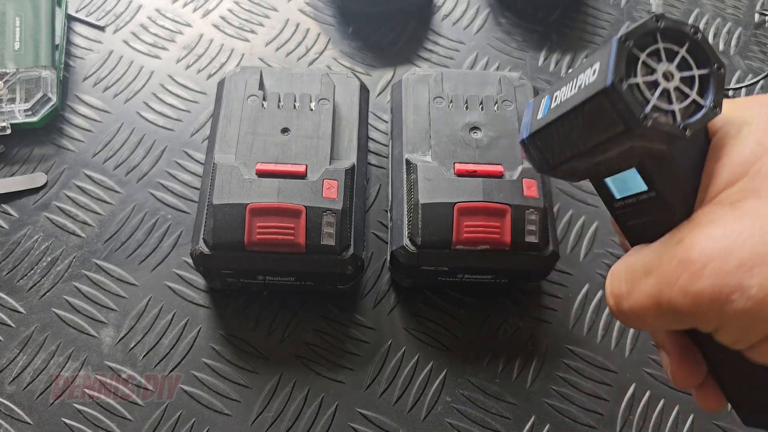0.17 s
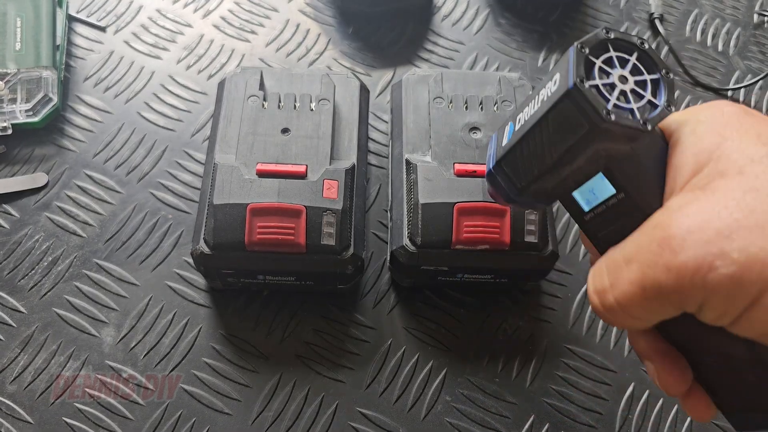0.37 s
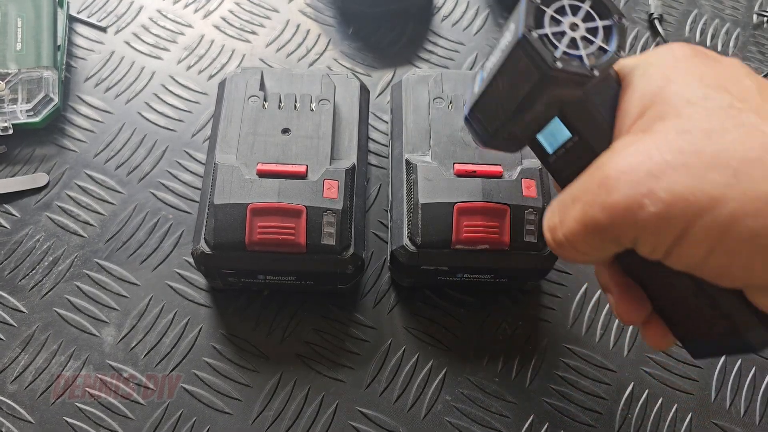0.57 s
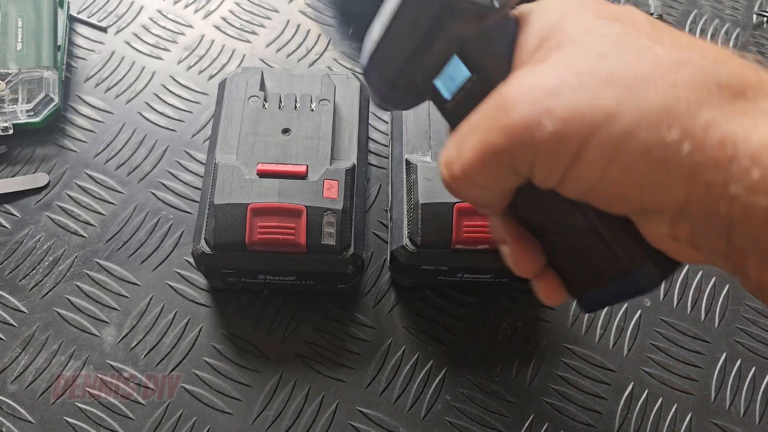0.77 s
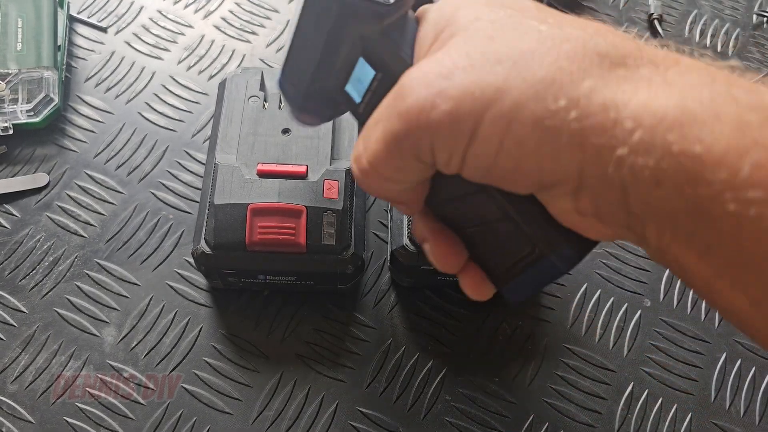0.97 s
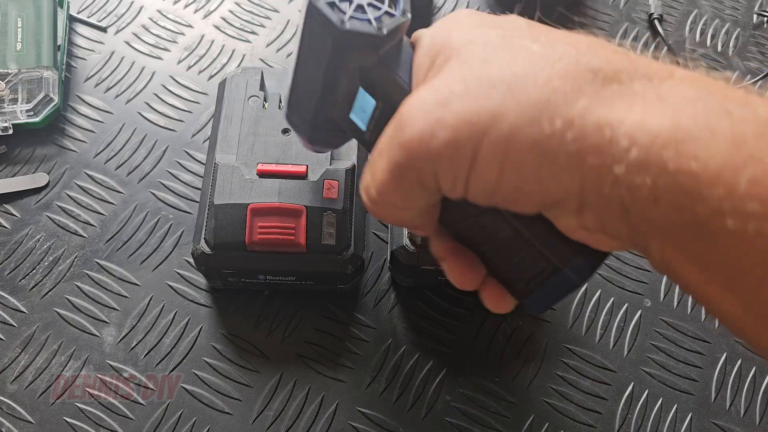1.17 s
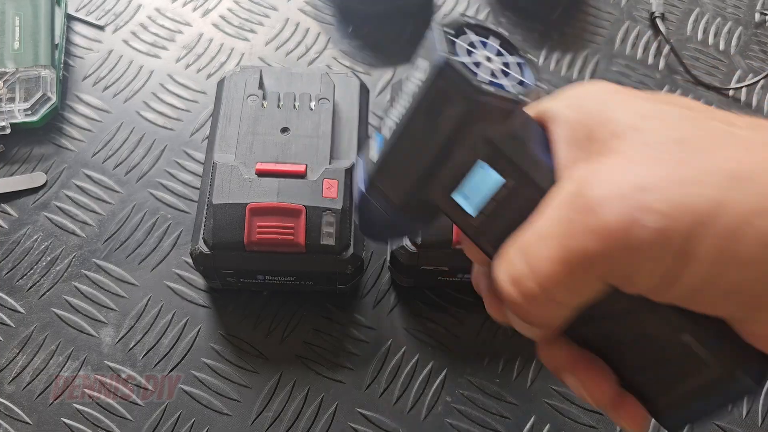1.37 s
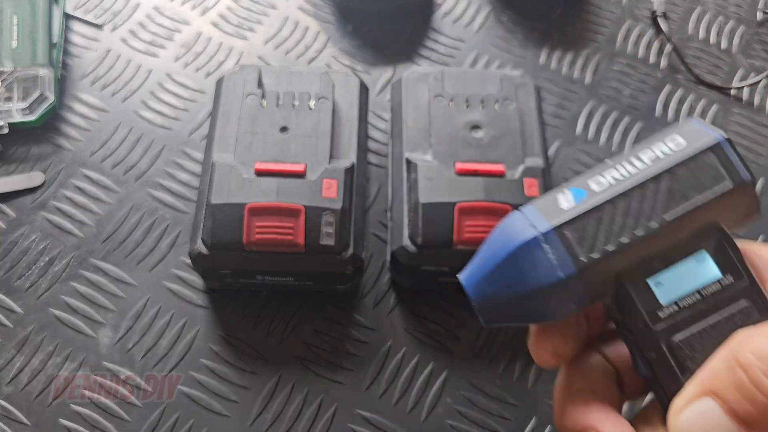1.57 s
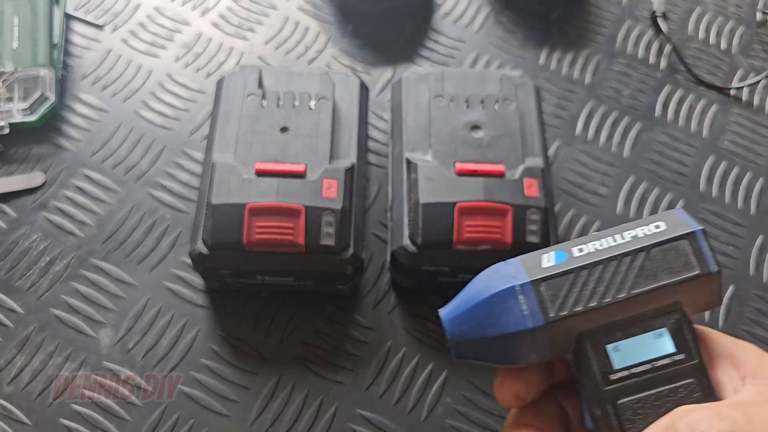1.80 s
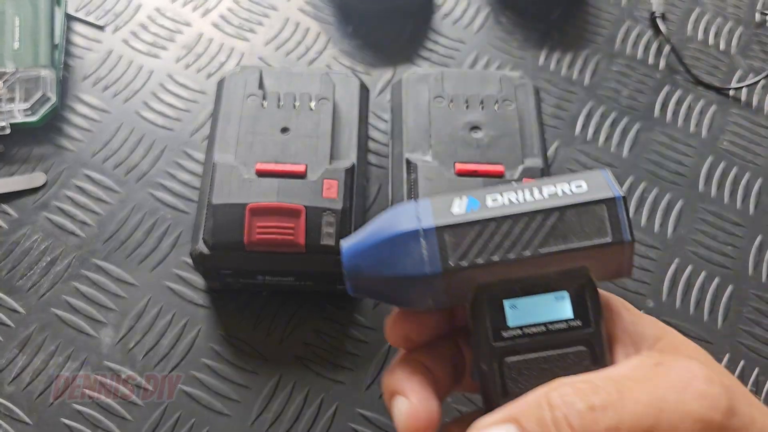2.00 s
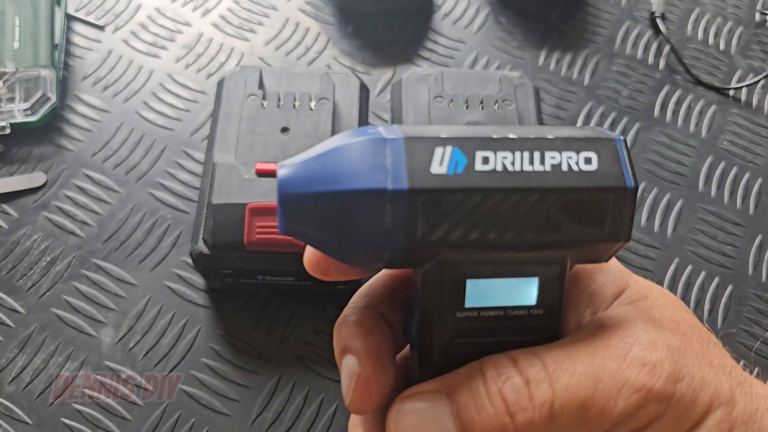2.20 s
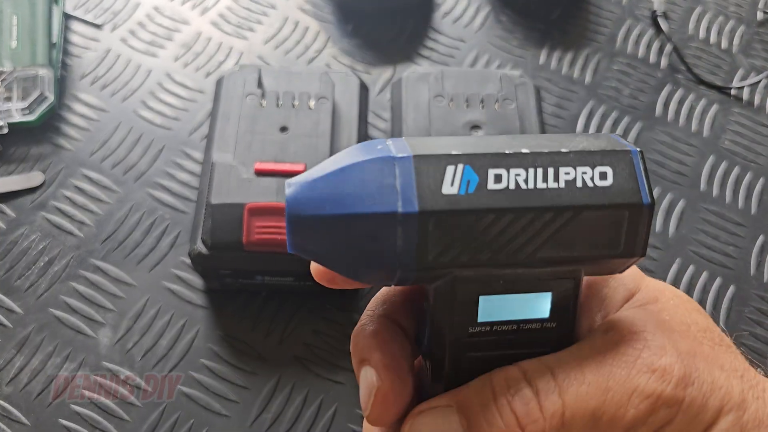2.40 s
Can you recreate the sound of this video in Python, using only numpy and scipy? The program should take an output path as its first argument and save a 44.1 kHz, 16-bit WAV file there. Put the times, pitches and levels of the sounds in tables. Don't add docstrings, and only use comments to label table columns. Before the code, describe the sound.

A handheld electric blower runs at full speed from the start, a loud, bright rush of air with a steady whine near 1.9 kHz, its tone shifting as it moves, with low buffeting on the close microphone. Switched off around 1.46 seconds, the roar drops quickly; hiss and ringing tones glide downward, ending in a soft judder near 2.24 seconds, leaving faint workshop noise with little echo.

```python
import sys
import numpy as np
from scipy import signal
from scipy.fft import rfft, irfft, next_fast_len
from scipy.io import wavfile
from scipy.ndimage import uniform_filter1d, map_coordinates

SR = 44100
rng = np.random.default_rng(int(sys.argv[2]) if len(sys.argv) > 2 else 0)


def gain_from_db(level_db):
    decades = np.asarray(level_db, float) / 20
    return 10 ** decades


def unload_audio(sound):
    columns = np.transpose(np.atleast_2d(sound))
    steps = np.round(np.clip(columns, -1, 1) * 32767)
    wavfile.write(sys.argv[1], SR, steps.astype(np.int16))


N = 107868
TIME_S = np.arange(N) / SR

# time_s, shaft_hz
POWERED_SHAFT = [
    (0, 1927),
    (.3, 1958),
    (.75, 1943),
    (1.2, 1947),
    (1.47, 1934),
]
# time_s, nearness_db, turn (no unit), tilt (no unit), whine_db
HAND = [(0, 0, 0.13, 0.069, -20.5), (.2, -0.5, -0.19, 0.093, -26), (.4, -0.5, -0.14, 0.24, -25.5),
        (.52, -1, 0.11, 0.063, -24), (.58, -1.5, -0.04, 0.035, -17), (.63, -1.5, 0.91, 0.42, -22.5),
        (.72, -1.5, 0.16, 0.16, -15), (.9, -1, 0.25, 0.13, -17), (.98, -1.5, 0.75, 0.13, -24),
        (1.15, -1.5, 1.06, 0.24, -22), (1.22, 0, 0.75, -0.095, -23.5), (1.3, -3, 1.1, 0.92, -17.5),
        (1.4, -2, -0.15, 0.0067, -12), (1.47, -3.5, -0.25, -1.56, -15), (1.51, 2, 0.65, -1.45, -32),
        (1.66, 4, 0.65, 0.021, -55.5), (2.05, 5.5, -0.032, -0.52, -78), (2.44, 4, -0.3, 0, -79)]
# pitch_hz, width_hz, level_db, change_db_per_turn, change_db_per_tilt
CASING = [(196, 330, -18.5, -2.5, -3), (658, 550, -8.5, -4, 3.5), (1404, 350, 0, -1, 3),
          (1667, 388, 1, -1, 4.5), (2747, 356, -4, -2.5, 13), (3125, 410, -5.5, 3.5, 3.5),
          (4360, 570, -6, 4.5, -1), (5580, 555, -5.5, 1.5, 0), (6850, 860, -7.5, -3, -2.5),
          (8640, 1100, -14.5, -2, -4), (9910, 530, -8.5, -2.5, -3), (11180, 2140, -21, -1, -0.5),
          (13160, 1600, -21.5, -0.5, -4.5), (14800, 2400, -32.5, 0, -3)]
# pitch_hz, width_hz, level_db
DUCT = [(740, 320, -18.5), (1480, 286, -8), (2916, 640, 0.5), (3225, 540, 1), (4520, 870, -6.5),
        (5910, 400, 0.5), (7070, 450, -5), (7500, 220, -0.5), (8920, 990, -9), (9400, 320, -6),
        (10380, 420, -9), (12000, 560, -11.5), (12770, 950, -15), (15800, 850, -18)]
# multiple (no unit), level_db, panel_hz, width_hz
PANELS = [(2, -22, 2530, 90), (2, -22, 2800, 260), (2, -23, 3330, 350), (2, -33, 3880, 150),
          (1, -29, 1420, 230), (1, -43, 780, 220), (3, -15, 4200, 230), (4, -22, 6200, 150),
          (4, -24, 6950, 300), (5, -25, 7600, 200), (5, -26, 8900, 450), (5, -32, 2640, 200),
          (6, -40, 2800, 120), (3, -24, 5350, 250)]
# time_s, level_db
BUFFET = [(0.0, -39), (0.05, -33), (0.21, -34.5), (0.47, -31.5), (0.69, -44), (0.74, -26), (0.78, -48),
          (0.83, -31), (0.86, -53), (1.21, -60), (1.28, -41), (1.37, -55), (1.43, -46), (1.54, -49),
          (1.58, -37), (1.68, -48.5), (2.04, -64), (2.44, -60)]
# pitch_hz, level_db_per_hz
RUMBLE = [(15, -41), (25, 3), (46, -5), (59, -4.5), (102, -4), (140, -10), (180, -6), (310, -120)]
# pitch_hz, level_db_per_hz
WORKSHOP = [(59, -50), (100, -17), (258, -13), (386, -7.5), (627, -23), (843, -13.5), (1230, -8.5),
            (4100, -9), (15500, -49)]
# centre_s, level_db, length_s, pitch_hz, width_hz
PUFFS = [
    (.055, -22.5, 0.028, 64.6, 25),
    (1.59, -37, 0.029, 153, 70.5),
]
# pitch_hz, width_hz, rms_level_db
TUBE = [(15300, 500, -33), (13450, 350, -26), (12100, 300, -28), (10490, 300, -24), (9500, 250, -36),
        (8600, 300, -27), (7450, 480, -29), (6500, 250, -42), (5930, 220, -26), (4950, 200, -34),
        (4400, 250, -39)]
# pitch_hz, width_hz, level_db
GRIP = [(237, 99, -7), (330, 140, -0.5), (437, 130, 1.5), (610, 300, -9)]

OFF_S, BALANCE_HZ, DRAG_PER_S = 1.463, 394.4, 0.87
ROAR_DB, ROAR_POWER = -11, 4.26
FAN_DB, FAN_POWER = -12, 1.7
DULLING = 0.5
BLOWN = 0.73
BLADES, BLADE_END_S = 13, 2.265
OCTAVE_DB, OCTAVE_HZ = -17, 14000
JUDDER_S, JUDDER_DB, JUDDER_RISE_S, JUDDER_FADE_DB_PER_S, UNEVEN_DB = 2.24, -37, 0.025, 64, 2.5
WORKSHOP_DB, ROOM_DB, ROOM_T60_S = -46, -20, 0.3
WIDEN = 1.59
LOW_EDGE_HZ, TOP_HZ = 52, 15730


def unit(x):
    return x / np.sqrt(np.mean(x ** 2) + 1e-20)


def curves(rows):
    knots_s, *columns = np.transpose(rows)
    return [np.interp(TIME_S, knots_s, column) for column in columns]


def wobble(rate):
    knots = rng.standard_normal(int(N * rate / SR) + 4)
    return map_coordinates(knots, [np.arange(N) * rate / SR])


def filtered(x, response):
    size = next_fast_len(N + 8192)
    spectrum = rfft(x, size) * response(np.fft.rfftfreq(size, 1 / SR))
    return irfft(spectrum, size)[..., :N]


def modes(rows, f):
    hz, width, db = np.transpose(rows)[:3, :, None]
    damping = 1j * f * WIDEN * width
    once = damping / (hz ** 2 - f * f + damping)
    sign = (-1.) ** np.arange(len(rows))[:, None]
    return sign * gain_from_db(db) * once * np.abs(once)


def turbulence(patchy_db):
    cells = signal.stft(rng.standard_normal(N), nperseg=512)[2]
    patches = uniform_filter1d(rng.standard_normal(cells.shape), size=8, axis=0)
    patches = uniform_filter1d(patches, size=8, axis=1)
    return signal.istft(cells * gain_from_db(patchy_db * unit(patches)), nperseg=512)[1][:N]


def coloured(points, patchy_db):
    points_hz, points_db = np.transpose(points)

    def response(f):
        return gain_from_db(np.interp(np.log(f + 1), np.log(points_hz), points_db, -120, -120))

    return unit(filtered(turbulence(patchy_db), response))


def shaft_hz():
    powered, = curves(POWERED_SHAFT)
    coast = DRAG_PER_S * np.clip(TIME_S - OFF_S, 0, None)
    return BALANCE_HZ / np.tan(np.arctan(BALANCE_HZ / powered) + coast)


def roar(speed, turn, tilt):
    bands = filtered(turbulence(patchy_db=1.5), lambda f: modes(CASING, f))
    casing = np.array(CASING)
    aim_db = casing[:, 3:4] * turn + casing[:, 4:5] * tilt
    aimed = (gain_from_db(aim_db) * bands).sum(0) / np.std(bands.sum(0))
    return gain_from_db(ROAR_DB + 1.24 * wobble(25.62)) * speed ** ROAR_POWER * aimed


def fan(speed):
    bands = filtered(turbulence(patchy_db=1), lambda f: modes(DUCT, f))
    powers = FAN_POWER + DULLING * np.array(DUCT)[:, :1] / 10000
    hiss = (speed ** powers * bands).sum(0) / np.std(bands.sum(0))
    ring_left = 1 - BLOWN * speed ** 3
    return gain_from_db(FAN_DB + 0.83 * wobble(20)) * ring_left * hiss


def whine(hz, whine_db):
    turns = 2 * np.pi * np.cumsum(hz) / SR + 0.22 * wobble(60)
    out = gain_from_db(whine_db + 0.5 * wobble(30.8)) * np.sin(turns)
    for multiple, db, panel_hz, width in PANELS:
        ring = np.exp(-((multiple * hz - panel_hz) / width) ** 2)
        out = out + gain_from_db(db + wobble(49.8)) * ring * np.sin(multiple * turns)
    return np.sqrt(2) * out


def room(x):
    t = np.arange(SR // 2) / SR
    tail = rng.standard_normal(len(t)) * gain_from_db(-60 * t / ROOM_T60_S)
    return gain_from_db(ROOM_DB) * signal.fftconvolve(x, tail / np.linalg.norm(tail))[:N]


def buffet():
    level_db, = curves(BUFFET)
    gusts = gain_from_db(1.9 * wobble(13.96)) * coloured(RUMBLE, patchy_db=1.0)
    return gain_from_db(level_db) * unit(gusts)


def workshop():
    return gain_from_db(WORKSHOP_DB) * coloured(WORKSHOP, patchy_db=5.5)


def puff():
    out = np.zeros(N)
    for centre_s, db, length_s, hz, width in PUFFS:
        t = TIME_S - centre_s
        swell = np.exp(-(t / length_s) ** 2)
        out += gain_from_db(db) * swell * np.sin(2 * np.pi * hz * t + wobble(width))
    return out


def blade_tone(hz):
    tone_hz = BLADES * hz
    phase = 2 * np.pi * np.cumsum(tone_hz) / SR
    wave_hz, width, db = np.transpose(TUBE)[:, :, None]

    def tube(f):
        power = 2 * gain_from_db(2 * db) / (1 + ((f - wave_hz) / width) ** 2) ** 3
        return np.sqrt(power.sum(0)) * (f < SR / 2)

    octave_level = gain_from_db(OCTAVE_DB) * (2 * tone_hz / OCTAVE_HZ) ** 2 * tube(2 * tone_hz)
    fade_db = 2 * wobble(70) - 300 * np.clip(TIME_S - BLADE_END_S, 0, None)
    return gain_from_db(fade_db) * (tube(tone_hz) * np.sin(phase) + octave_level * np.sin(2 * phase))


def judder():
    t = TIME_S - JUDDER_S
    knocks = gain_from_db(UNEVEN_DB * wobble(70)) * rng.standard_normal(N)
    shake = unit(filtered(knocks, lambda f: modes(GRIP, f).sum(0)))
    rise = np.clip(t / JUDDER_RISE_S, 0, 1)
    return gain_from_db(JUDDER_DB - JUDDER_FADE_DB_PER_S * np.abs(t)) * rise * shake


def scene():
    hz = shaft_hz()
    speed = hz / POWERED_SHAFT[0][1]
    near_db, turn, tilt, whine_db = curves(HAND)
    air = gain_from_db(near_db) * (roar(speed, turn, tilt) + fan(speed))
    blower = air + whine(hz, whine_db) + blade_tone(hz)
    mono = blower + room(blower) + buffet() + workshop() + puff() + judder()
    return np.array([mono, mono])


def low_pass(x):
    return signal.sosfilt(signal.butter(12, 16880, fs=SR, output="sos"), x)


def record(dry):
    held = dry / (1 + np.abs(dry / 0.9) ** 6) ** (1 / 6)
    mix = filtered(held, lambda f: (f < TOP_HZ) / np.sqrt(1 + (LOW_EDGE_HZ / (f + 1)) ** 8))
    return low_pass(mix)


dry = scene()
out = record(dry)
unload_audio(out)
```